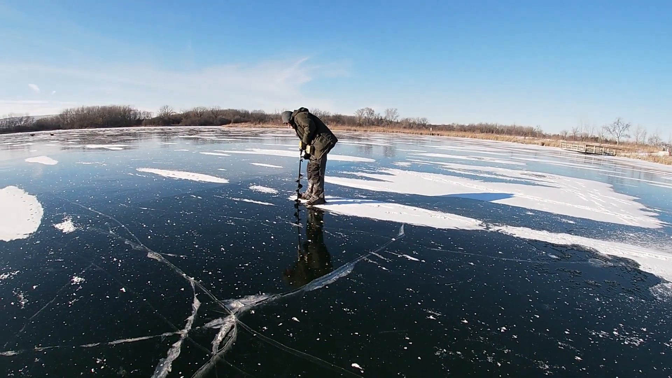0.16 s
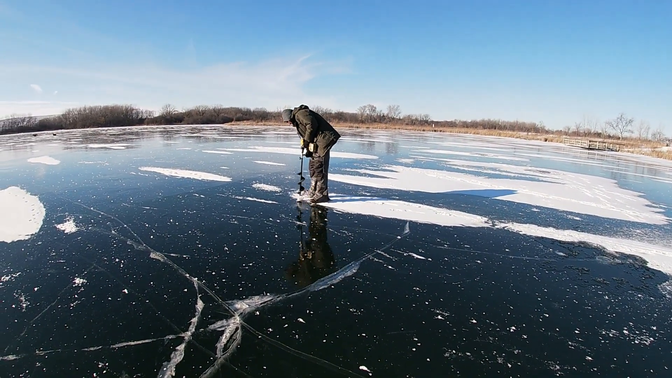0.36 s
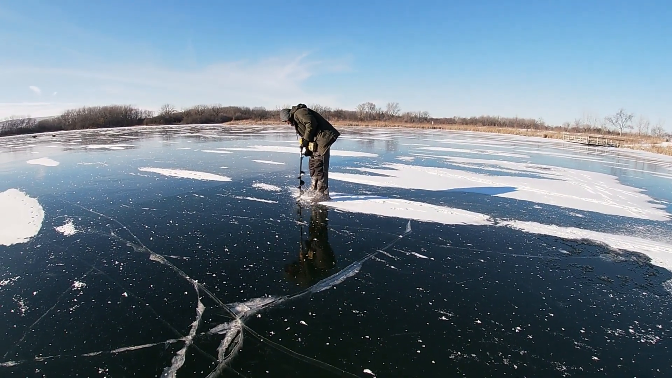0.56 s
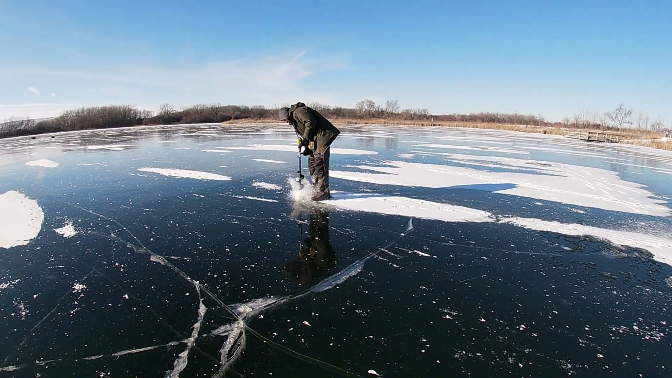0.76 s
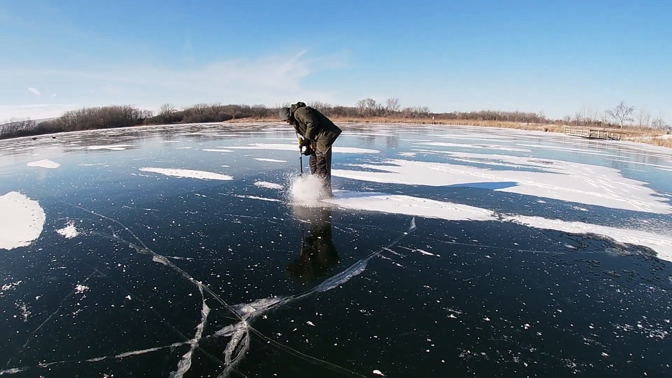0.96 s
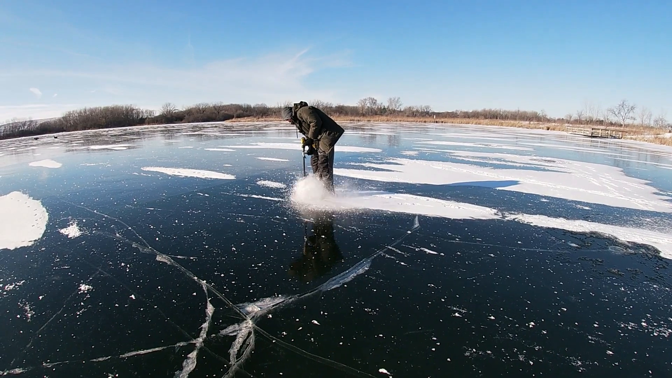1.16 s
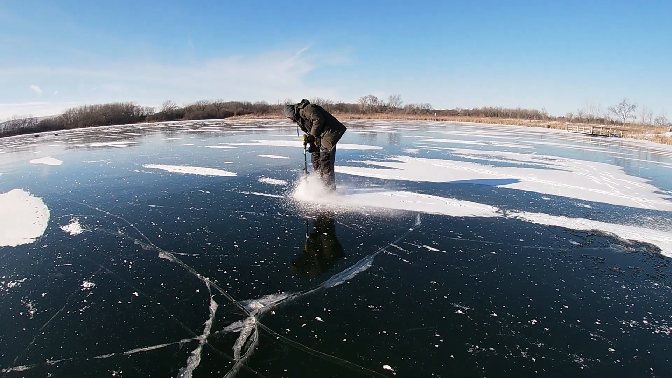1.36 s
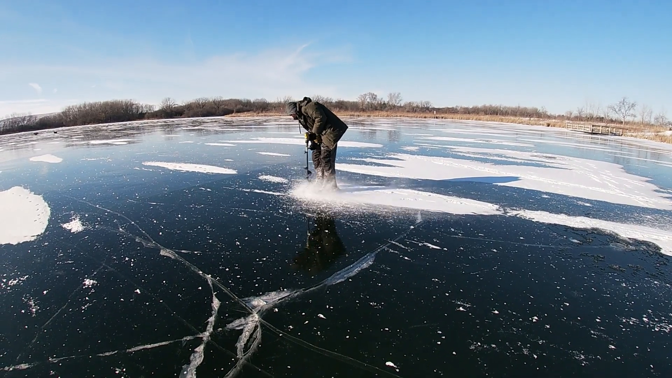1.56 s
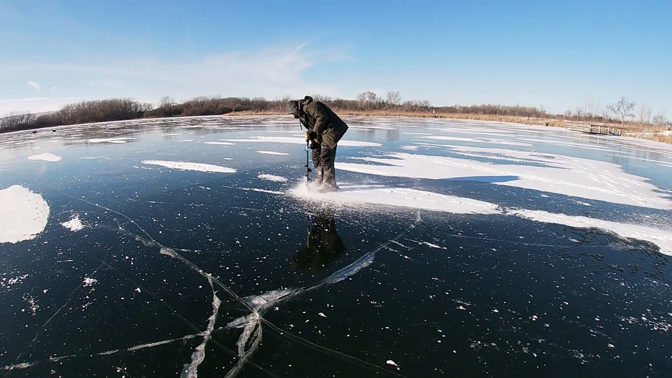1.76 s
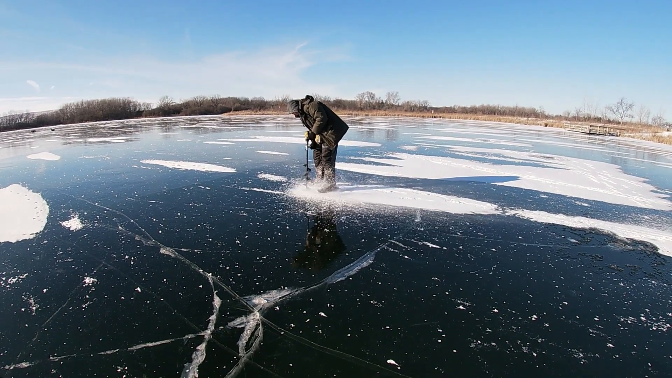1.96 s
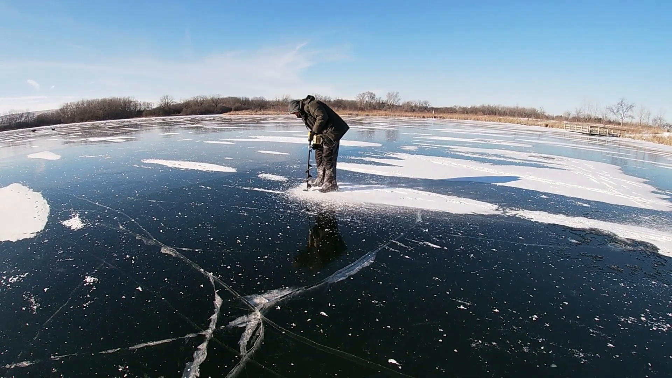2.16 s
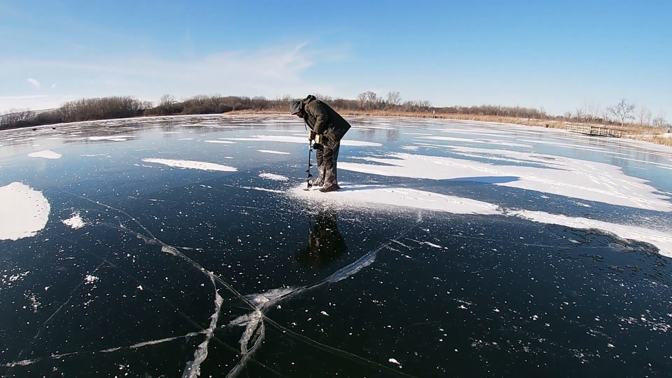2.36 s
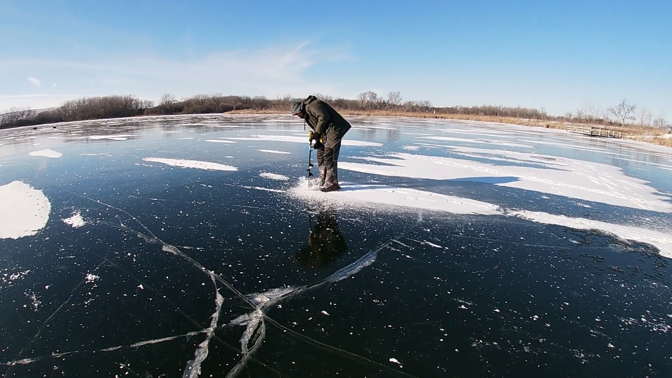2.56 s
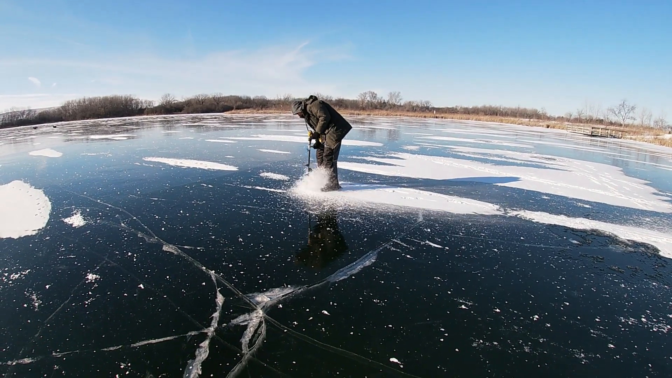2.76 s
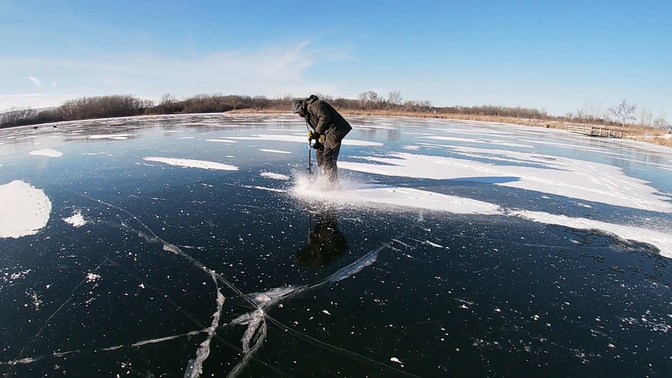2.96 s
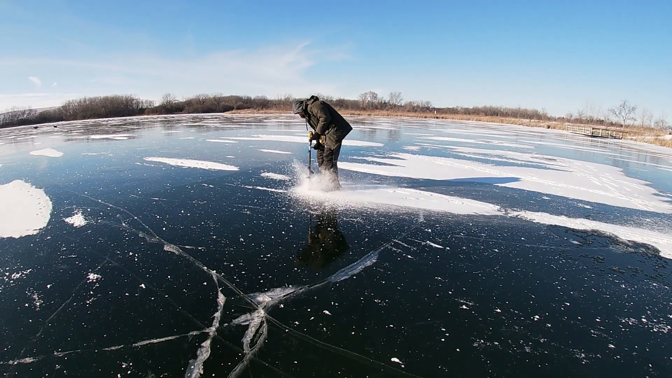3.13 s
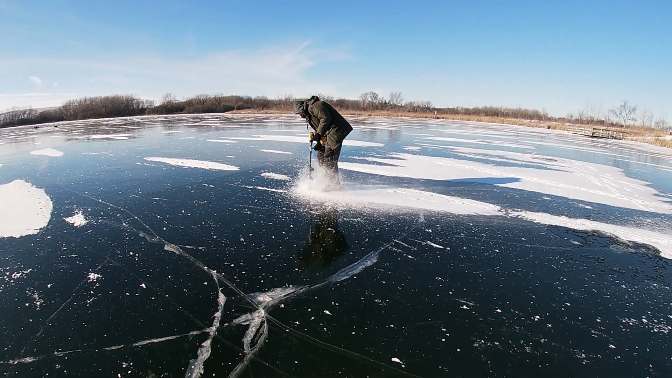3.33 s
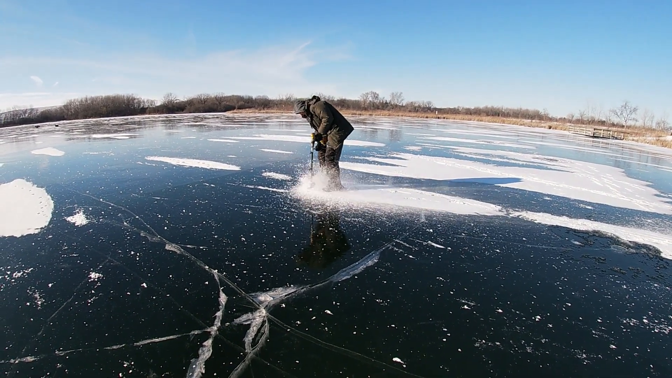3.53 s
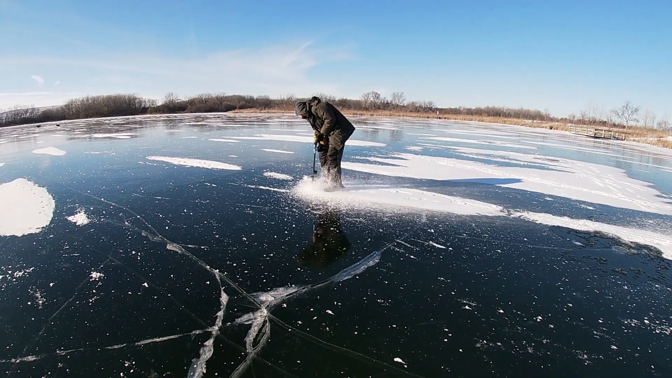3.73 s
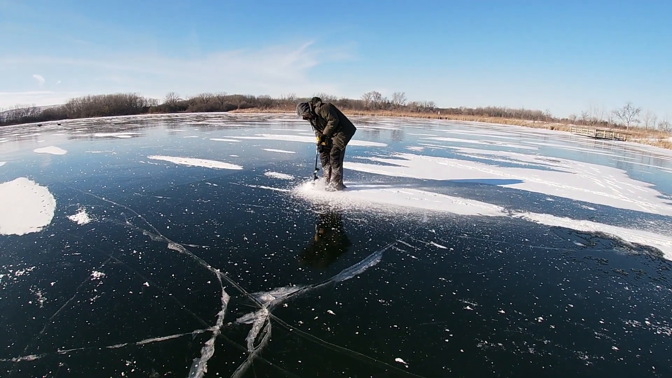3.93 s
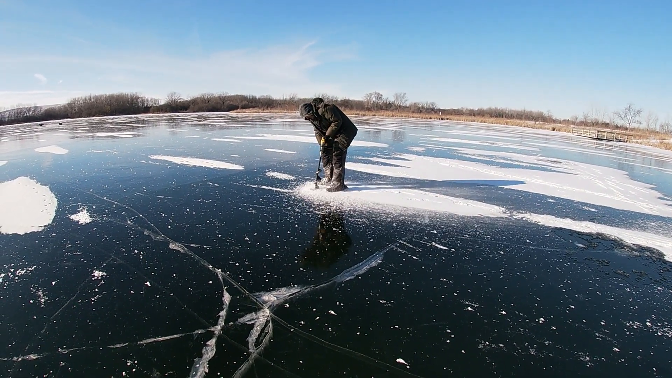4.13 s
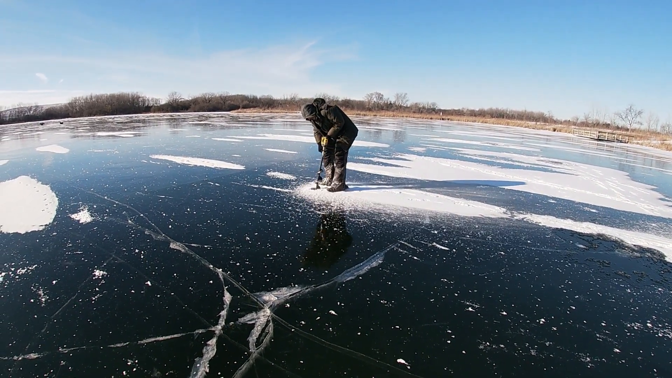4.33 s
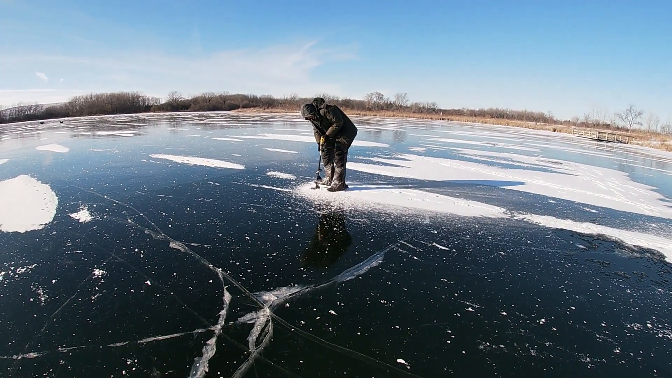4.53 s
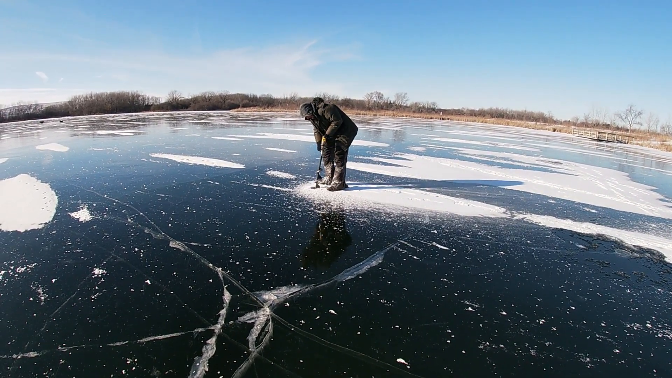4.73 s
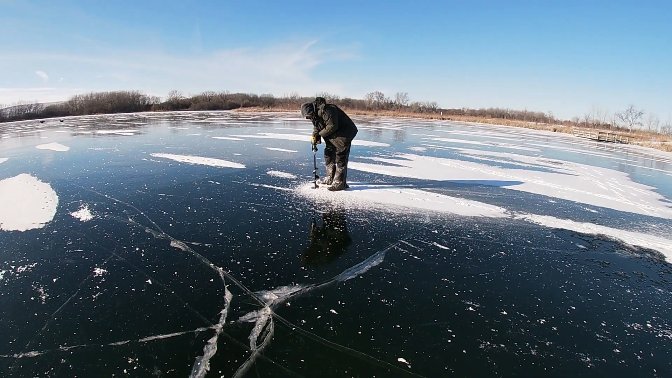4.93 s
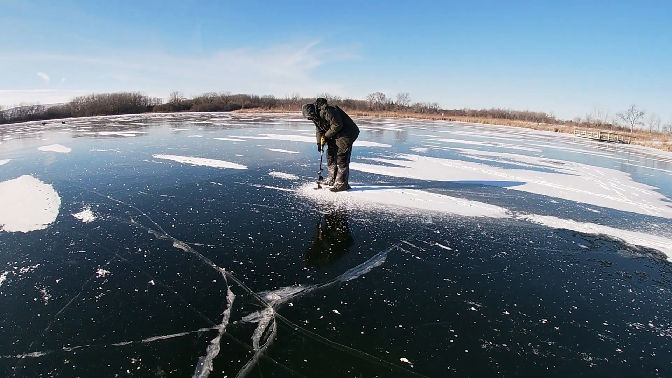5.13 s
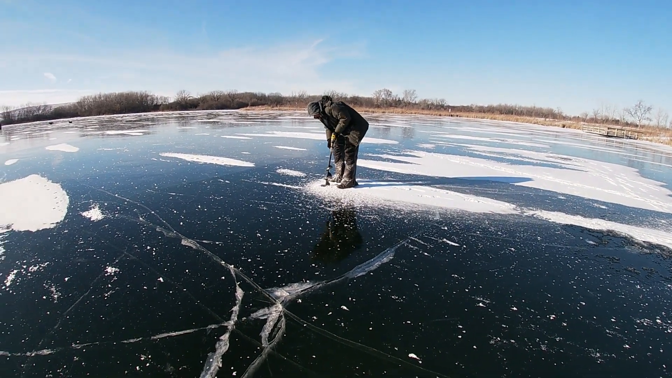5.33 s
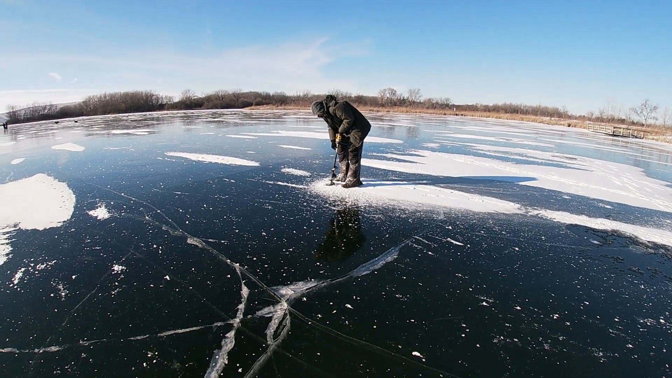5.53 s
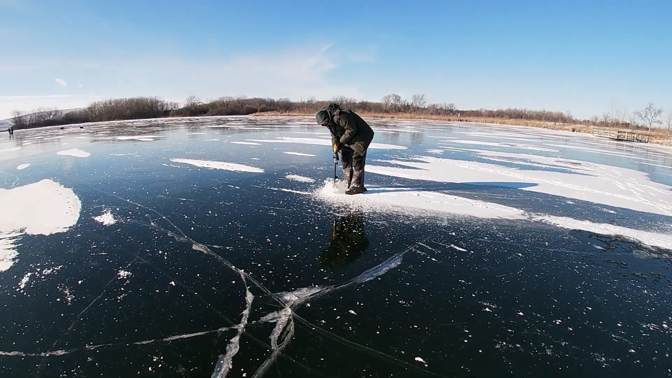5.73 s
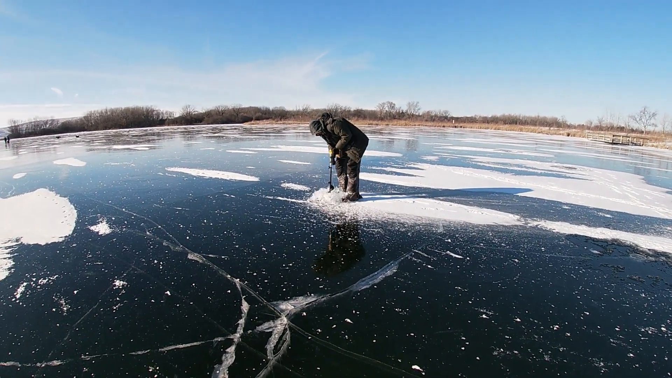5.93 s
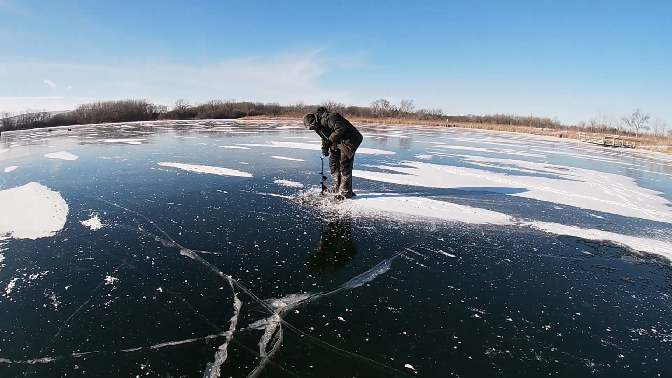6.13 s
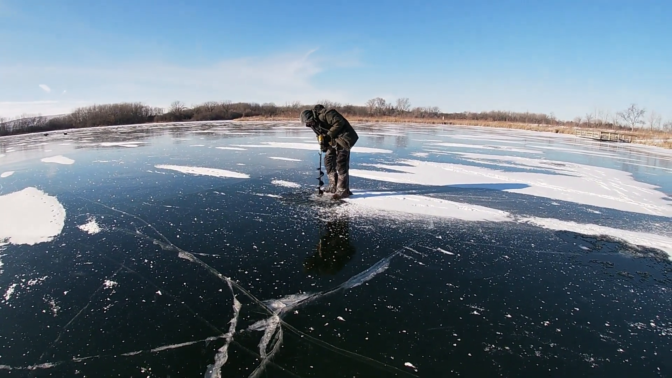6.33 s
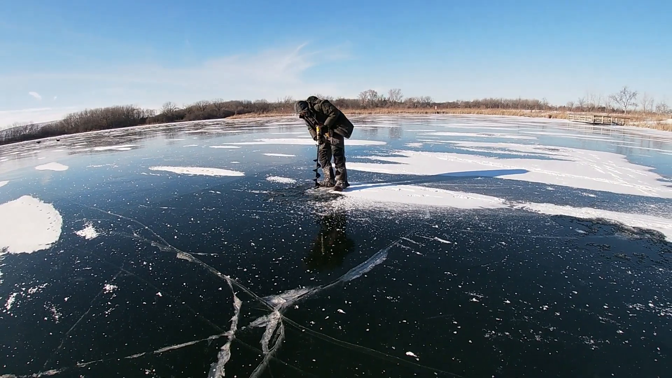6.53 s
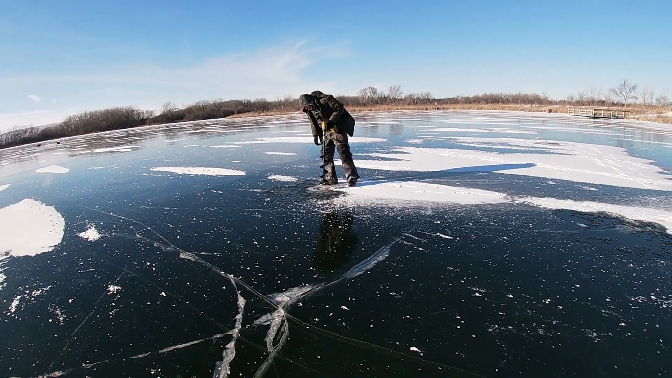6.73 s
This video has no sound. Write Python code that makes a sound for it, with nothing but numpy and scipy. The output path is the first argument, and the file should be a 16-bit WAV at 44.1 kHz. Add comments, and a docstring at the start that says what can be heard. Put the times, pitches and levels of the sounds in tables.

```python
"""Wind buffets the microphone throughout; within half a second an ice auger bites into a frozen lake.
Its blades scrape and chatter in quick bites, in three spells with two stops; slush churns in the last one.
Flickering noise through steel and ice resonances makes the scrape, decaying sines the chips, noise bursts
the knocks, resonant noise and gliding sines the hole, narrow noise the squeaks, shaped noise the wind."""
import sys
import numpy as np
from scipy import signal
from scipy.fft import rfft, irfft, next_fast_len
from scipy.io import wavfile
from scipy.ndimage import uniform_filter1d, map_coordinates

SR = 44100
rng = np.random.default_rng(int(sys.argv[2]) if len(sys.argv) > 2 else 0)


def persist_wave(psi):
    """Save psi, clipped to +-1, as 16-bit WAV."""
    counts = np.round(np.clip(psi, -1, 1) * 32767).astype(np.int16)
    wavfile.write(sys.argv[1], SR, np.atleast_2d(counts).T)


N = 303701
T = np.arange(N) / SR


def amp(db):
    """dB to gain."""
    return 10 ** (np.asarray(db) / 20)


def unit(x):
    """Scaled to rms 1."""
    return x / np.sqrt(np.mean(x ** 2) + 1e-20)


def curves(rows):
    """One value per sample for each column after the time."""
    time_s, *columns = np.transpose(rows)
    return [np.interp(T, time_s, column) for column in columns]


def wobble(knots_per_s):
    """Smooth random curve through normal random knots."""
    knots = rng.standard_normal(int(N * knots_per_s / SR) + 4)
    return map_coordinates(knots, [T * knots_per_s])


def filtered(x, response):
    """x times a complex response of frequency."""
    n = x.shape[-1]
    m = next_fast_len(n + 8192)  # zero padding for the ring-out
    spectrum = rfft(x, m) * response(np.fft.rfftfreq(m, 1 / SR))
    return irfft(spectrum, m)[..., :n]


def colour(points):
    """Gain through (freq_hz, level_db) points on a log frequency axis."""
    freq_hz, level_db = np.transpose(points)
    return lambda f: amp(np.interp(np.log(f + 1), np.log(freq_hz + 1), level_db))


def modes(table):
    """Sum of (centre_hz, width_hz, level_db) resonances, alternating in sign."""
    def response(f):
        total = 0
        for k, (centre_hz, width_hz, level_db) in enumerate(table):
            damping = 1j * f * width_hz
            total = total + (-1) ** k * amp(level_db) * damping / (centre_hz ** 2 - f * f + damping)
        return total
    return response


def unit_gain(response):
    """Gain that gives a response an rms of 1 over the band."""
    return 1 / np.sqrt(np.mean(np.abs(response(np.linspace(0, SR / 2, num=4096))) ** 2))


def noise(patchy_db):
    """Noise of rms 1; random time-frequency patches vary its level by patchy_db rms."""
    z = signal.stft(rng.standard_normal(N), nperseg=256)[2]
    field = uniform_filter1d(rng.standard_normal(z.shape), 3, axis=0)
    field = uniform_filter1d(field, 5, axis=1)
    patched = z * amp(patchy_db * unit(field))
    return unit(signal.istft(patched, nperseg=256)[1][:N])


# blade catches tearing ice: start_s, level_db, skip_depth_db (no skip if <= 0)
BITES = [(.444, -32, 0), (0.5044, -29.5, 3.5), (0.7995, -31, -20.5), (.9984, -24, 1), (1.167, -22, 0.5),
         (1.206, -24.5, 4.5), (1.2486, -22, 3), (1.3394, -28, 4.5), (1.389, -30.5, 11), (1.417, -42, 9),
         (1.51, -15.5, 4), (1.532, -24, 0.5), (1.585, -25.5, -4.5), (1.6093, -17, 5), (1.667, -18.5, 3),
         (1.689, -20.5, 9.5), (1.7085, -19, 3), (1.725, -29, 6.5), (1.7885, -28, 5), (1.824, -19.5, 4),
         (1.843, -29.5, 8.5), (1.8768, -16.5, 4), (1.8967, -21, 13), (1.956, -17, 2.5), (1.974, -18, 8),
         (2.019, -21, -9), (2.0347, -23, 5), (2.0892, -36, 8), (2.1245, -28, 4), (2.1835, -37, -5),
         (2.225, -36.5, 9), (2.671, -27.5, 2), (2.6879, -19, 2), (2.743, -32.5, 0.5), (2.791, -24.5, 6.5),
         (2.8294, -26, 8.5), (2.874, -21.5, 7.5), (2.9194, -14, 6), (2.9375, -16.5, 11),
         (2.958, -17.5, 9.5), (3.004, -18, 9), (3.046, -16, 2), (3.078, -22, 6), (3.125, -17, 1),
         (3.1613, -20, 3.5), (3.2056, -20, 3.5), (3.248, -17.5, 8.5), (3.296, -19.5, 9),
         (3.3366, -19.5, 9.5), (3.383, -21.5, 2.5), (3.419, -19, 2), (3.475, -24.5, 3.5), (3.512, -18, 1),
         (3.572, -23, 1), (3.622, -20, 3.5), (3.684, -21, -3), (3.7185, -24, -5), (3.973, -21.5, 3),
         (4.028, -22.5, -1), (5.5634, -31.5, -4), (5.586, -45, -1), (5.6615, -26, -18), (5.7159, -37.5, 7),
         (5.7334, -26.5, 2), (5.794, -33, -1), (5.8185, -21, 4), (5.892, -23, 4), (5.918, -22, -3),
         (5.963, -21.5, 5), (5.9883, -21, -7), (6.025, -18.5, 4), (6.078, -29, -3), (6.128, -33, 6),
         (6.152, -31.5, 3), (6.31, -35, 4)]
# blade and ice sheet resonances: centre_hz, width_hz, level_db
BLADE_MODES = [(2008, 207, 12), (2866, 430, 4.5), (3404, 82, 1.5), (4016, 48, 5), (4640, 100, -4)]
# low grind resonances: centre_hz, width_hz, level_db
GRIND_MODES = [(735, 246, -3.5), (1340, 189, 1), (1568, 210, -1)]
# scrape spectrum: freq_hz, level_db
SCRAPE_COLOUR = [(900, -39.5), (1500, -10), (1900, -8.5), (3500, 4.5), (4800, 1.5), (5300, -1),
                 (5800, -7.5), (6150, -25), (7500, -56), (16000, -100)]
# fine shavings spectrum: freq_hz, level_db
SHAVINGS_COLOUR = [(4500, -6), (6000, 1.5), (6600, -2), (7200, -2), (7800, -6), (8400, -2), (9500, -8.5),
                   (10300, -13), (11800, -18.5), (13000, -24), (14000, -35.5), (15500, -47)]
SKIP_S, CATCH_S, TEAR_S = .012, 0.002, 0.017  # time constants: lift before, onset, decay after
SNAP_S, SNAP_DB = 0.0017, -5  # chip breaking off: decay constant, level over the tear


def auger():
    """Crumbling ice drives the blades; bites start fast and die, most after a short skip."""
    scrape_db, fine_db, low_db, upper_db = contact()
    power = amp(scrape_db) ** 2
    t = T[:SR // 10]
    for start_s, level_db, skip_db in BITES:
        i = round(start_s * SR)
        skip_shape = np.exp(-(t[::-1] / SKIP_S) ** 2)
        power[i - len(t):i] *= amp(-max(skip_db, 0) * skip_shape) ** 2
        tear = np.exp(-(t / TEAR_S) ** 2)
        snap = amp(SNAP_DB) * np.exp(-t / SNAP_S)
        catch = 1 - np.exp(-t / CATCH_S)
        power[i:i + len(t)] += (amp(level_db) * (tear + snap) * catch) ** 2

    # ice breaks unevenly, so the force flickers
    flicker = unit(amp(0.52 * wobble(50) + 0.2 * wobble(300)))
    force = np.sqrt(power) * flicker
    crumbs = force * (noise(1.5) + 0.45 * chips(count=7000))

    def body(f):
        return colour(SCRAPE_COLOUR)(f) * (1 + 0.87 * np.abs(modes(BLADE_MODES)(f)))

    def grind(f):
        return modes(GRIND_MODES)(f) / (1 + (f / 2000) ** 4) / (1 + (550 / (f + 1)) ** 4)

    shavings = colour(SHAVINGS_COLOUR)
    spray = uniform_filter1d(force, size=SR // 120) * amp(fine_db) * noise(3.1)
    # sharper contact drives the modes above 2.8 kHz harder
    upper = filtered(crumbs, lambda f: 1 / (1 + (2800 / (f + 1)) ** 4))
    tilted = crumbs + (amp(upper_db) - 1) * upper
    out = amp(-3.5) * unit_gain(body) * filtered(tilted, body)
    out += unit_gain(grind) * filtered(amp(low_db) * crumbs, grind)
    return out + unit_gain(shavings) * filtered(spray, shavings)


# cutting spells, one table each: time_s, scrape_db, then re scrape: shavings_db, grind_db, upper_modes_db
CUTS = [
    [(.32, -59, -40, -7, 0), (.372, -36, -32, -8, -12), (.395, -28, -34, -11, -3), (.42, -37, -18, -13, -4),
     (.46, -30.5, -16, -9, 4.5), (.58, -32.5, -9.5, -15, 8.5), (.61, -29, -22, -11, -4.5),
     (.68, -40.5, -14, -9.5, 3.5), (.77, -44.5, -11, -6, 9.5), (.83, -25.5, -11.5, -10, 8.5),
     (1.1, -19.5, -28.5, -18.5, -3.5), (1.5, -18, -28.5, -16, -5.5), (1.84, -21, -22, -7, -1),
     (1.93, -32.5, -19, -10, 3), (2.13, -29, -25.5, -10.5, -9.5), (2.17, -47, -16, -14, 3),
     (2.26, -39, -21, -8, -3)],
    [(2.61, -41, -27, 3, 5), (2.64, -31, -16.5, -8, 2), (2.77, -21.5, -15, -11.5, 4.5),
     (3.05, -24, -18, -13, 0), (3.45, -24, -18.5, -11, 0.5), (3.9, -19.5, -27, -16, -4),
     (4.135, -21, -28.5, -13, -7), (4.165, -40, -37, -13, -21), (4.38, -59, -41, -26, -13)],
    [(4.97, -44.5, -28, -4, -11), (5.05, -39, -21, -2, -5), (5.1, -42.5, -24, 0, -2),
     (5.15, -49.5, -28, -2, -12), (5.37, -47, -26, 1, -3), (5.41, -40, -28, -5, -4),
     (5.45, -50, -31, 2, -10), (5.53, -46.5, -26, 7, -2), (5.555, -31.5, -26, -7, -3),
     (5.62, -31, -25.5, -5.5, -6), (5.68, -30, -21.5, -0.5, 2.5), (5.98, -28, -19.5, -17.5, -2),
     (6.09, -36.5, -20.5, -20, -3), (6.33, -37.5, -21.5, -16, -2), (6.5, -59, -14, -1, 6)],
]
# blades resting on the ice: scrape_db, shavings_db, grind_db, upper_modes_db
RESTING = (-56, -25.5, -0.5, -6.5)


def contact():
    """Blade controls: those of a spell while it lasts, else those of rest, smoothed over 10 ms."""
    out = np.outer(RESTING, np.ones(N))
    for rows in CUTS:
        cutting = (T >= rows[0][0]) & (T <= rows[-1][0])
        out = np.where(cutting, curves(rows), out)
    return uniform_filter1d(out, size=SR // 100, axis=1)


def chips(count):
    """Ice splinters ping at pitches of their own, falling 60 dB in 60 cycles, cut at 9 ms."""
    u, z = rng.random((count, 2)), rng.standard_normal((count, 2))
    t = T[:400]
    pitch_hz = 2700 * np.exp(0.3817 * z[:, :1])
    envelope = amp(1.95 * z[:, 1:] - 60 * t * pitch_hz / 60) * (1 - np.exp(-t / 0.00013))
    splinters = envelope * np.sin(2 * np.pi * pitch_hz * t)
    at = (u[:, :1] * N).astype(int) + np.arange(len(t))
    return unit(np.bincount(at.ravel(), splinters.ravel())[:N])


PING_HZ, PING_LOG_SPREAD = 2500, .2  # median pitch, spread of its natural log
PING_T60_S, PING_DB = 0.071, 0  # decay, mean level over the bite


def pings():
    """Each bite frees a chip that rings briefly at a pitch of its own."""
    out, t = np.zeros(N), T[:SR // 20]
    draws = rng.standard_normal((len(BITES), 2))
    for (start_s, bite_db, _), (pitch_draw, level_draw) in zip(BITES, draws):
        pitch_hz = PING_HZ * np.exp(PING_LOG_SPREAD * pitch_draw)
        decay = amp(bite_db + PING_DB + 2.3 * level_draw - 60 * t / PING_T60_S)
        ring = decay * np.sin(2 * np.pi * pitch_hz * t) * (1 - np.exp(-t / CATCH_S))
        out[round(start_s * SR):][:len(t)] += ring
    return out


# steel on ice: start_s, level_db (before the resonances), centre_hz, crack_t60_s
KNOCKS = [(.0603, -39, 1900, .02), (.2843, -36, 2000, .015), (.3705, -9, 3600, .025),
          (.387, -13.5, 2200, .03), (2.626, -21.5, 2200, .02), (5.070, -6.5, 3300, .02),
          (5.5465, -1.5, 3300, .02), (6.619, -10.5, 4600, .025)]


def knocks():
    """A sharp blow and a short crack excite a broad snap and a resonance at the knock's centre."""
    out, t = np.zeros(N), T[:SR // 10]
    for start_s, level_db, centre_hz, t60_s in KNOCKS:
        blow = 0.94 * amp(-60 * t / 0.009) * np.sign(rng.standard_normal(len(t)))
        crack = amp(-60 * t / abs(t60_s)) * rng.standard_normal(len(t))

        def snap(f):
            ring = modes([(centre_hz, 500, 0)])(f)
            broad = modes([(3000, 3500, -3)])(f)
            return (ring + broad) / (1 + 1j * f / 6000) ** 4

        out[round(start_s * SR):][:len(t)] += filtered(amp(level_db) * (blow + crack), snap)
    return out


# slush in the hole: time_s, level_db
SLUSH = [(4.95, -54), (5.03, -32), (5.15, -36), (5.53, -42), (5.68, -32), (5.78, -33), (5.83, -27),
         (5.88, -31), (5.99, -28), (6.09, -33.5), (6.22, -31.5), (6.27, -28), (6.31, -29.5), (6.42, -33.5),
         (6.55, -56), (6.62, -55)]
# glugs and groans of air in the hole: start_s, end_s, start_hz, end_hz, level_db (before waver and flutter)
GLUGS = [(1.425, 1.602, 736, 780, -52), (1.593, 1.837, 750, 760, -38), (2.528, 2.6, 438, 410, -37),
         (2.6, 2.664, 475, 395, -37), (5.009, 5.046, 598, 720, -32), (5.034, 5.087, 570, 583, -34.5),
         (5.227, 5.48, 570, 555, -37.5), (5.466, 5.562, 555, 694, -34), (5.598, 5.651, 560, 543, -27),
         (5.653, 5.687, 638, 720, -25), (5.691, 5.765, 532, 403, -29.5), (5.72, 5.759, 906, 857, -25),
         (5.908, 6, 620, 571, -29), (5.916, 5.981, 873, 890, -27), (5.993, 6.009, 680, 750, -15),
         (6.01, 6.084, 680, 653, -32.5), (6.252, 6.29, 562, 634, -29)]


def hole():
    """Slush sloshes in broad resonances; trapped air sings short unsteady glides."""
    def cavity(f):
        return modes([(400, 400, -2), (750, 500, 0), (1200, 900, -5)])(f) / (1 + (f / 2500) ** 4)

    slosh = unit(filtered(noise(4.5), cavity))
    wet = (T > SLUSH[0][0]) & (T < SLUSH[-1][0])
    out = wet * amp(curves(SLUSH)[0] + 0.93 * wobble(30)) * slosh
    waver, flutter, rasp = wobble(60), wobble(45), wobble(180)
    for start_s, end_s, start_hz, end_hz, level_db in GLUGS:
        pitch_hz = np.interp(T, [start_s, end_s], [start_hz, end_hz]) * (1 + 0.048 * waver)
        gate = np.clip(np.minimum(T - start_s, end_s - T) / 0.014, 0, 1)
        gate *= amp(2.6 * flutter + 3.6 * rasp)
        out += gate * amp(level_db) * np.sin(2 * np.pi * np.cumsum(pitch_hz) / SR)
    return out


# fuzzy squeaks and scuffs: start_s, end_s, centre_hz, width_hz (of a resonance applied twice), level_db
SQUEAKS = [(0, .035, 3300, 1400, -50), (.125, .185, 3030, 110, -57), (.125, .2, 3700, 1200, -55),
           (4.17, 4.273, 1630, 130, -44), (4.18, 4.27, 2000, 450, -43), (4.25, 4.388, 1930, 200, -44),
           (4.2, 4.385, 2550, 700, -52), (4.52, 4.556, 3950, 60, -53), (6.595, 6.617, 3400, 900, -41),
           (6.594, 6.616, 6000, 200, -55), (6.622, 6.655, 5000, 2500, -54), (6.682, 6.775, 4300, 700, -53),
           (6.682, 6.775, 5800, 1100, -59)]


def squeaks():
    """Noise through a squared resonance, with 7.6 ms ramps at both ends."""
    out = np.zeros(N)
    for start_s, end_s, centre_hz, width_hz, level_db in SQUEAKS:
        t = T[round(start_s * SR):round(end_s * SR)]
        resonance = modes([(centre_hz, width_hz, 0)])
        band = unit(filtered(rng.standard_normal(SR // 3), lambda f: resonance(f) ** 2))
        gate = np.clip(np.minimum(t - start_s, end_s - t) / 0.0076, 0, 1)
        out[round(start_s * SR):][:len(t)] += amp(level_db) * band[-len(t):] * gate
    return out


# wind strength: time_s, buffet_db, upper_lift_db, far_hiss_db
WIND = [(0.0, -36, 4, -39), (0.09, -21, -5.5, -36.5), (0.31, -30, -2, -34.5), (1.0, -18.5, -0.5, -35),
        (1.36, -28, 1, -39), (1.84, -22.5, 0.5, -39), (1.92, -34, -2, -35.5), (2.32, -24, -5, -35.5),
        (2.59, -32.5, -8.5, -37), (2.95, -24, 1.5, -37.5), (3.83, -23, 0, -37), (4.01, -19.5, 1, -40),
        (4.76, -28.5, -4, -36.5), (5.08, -22.5, 2.5, -35.5), (5.12, -37.5, 9, -36), (5.22, -21, -1, -36.5),
        (5.37, -29.5, -2.5, -34.5), (5.81, -20, -1.5, -40), (5.85, -24.5, 8.5, -38),
        (6.14, -30, 1.5, -32.5), (6.35, -18, 3, -34), (6.67, -30.5, -8.5, -30.5), (6.83, -19.5, -6, -36.5),
        (6.89, -15.5, -5, -35)]
# buffet spectrum: freq_hz, level_db
BUFFET_COLOUR = [(12, -39), (20, -8), (54, 1), (81, 2), (120, -2), (242, -19), (400, -40.5), (520, -38.5),
                 (880, -120)]
# far hiss spectrum: freq_hz, level_db
FAR_COLOUR = [(150, -1), (250, -2), (358, -6), (518, -9), (741, -13), (2000, -21), (5940, -64), (7720, -79),
              (13100, -120)]


def wind():
    """Eddies thump the microphone in lumps, small fast ones above 110 Hz; far air hisses smoothly."""
    buffet_db, lift_db, far_db = curves(WIND)
    rumble = filtered(rng.standard_normal(N), colour(BUFFET_COLOUR))
    buffet = unit(amp(1.7 * wobble(13)) * rumble)
    upper = filtered(buffet, lambda f: 1 / (1 + (110 / (f + 1)) ** 6))
    buffet += (amp(lift_db) - 1) * upper
    hiss_gain = amp(far_db + 1.1 * wobble(9))
    hiss = unit(filtered(noise(2.04), colour(FAR_COLOUR)))
    return amp(buffet_db) * buffet + hiss_gain * hiss


def scene():
    """Open lake: all sources add, no walls answer."""
    return (auger() + pings() + knocks() + hole() + squeaks() + wind())[None]


CEILING, TOP_HZ = .52, 15500  # full scale = 1


def record(dry):
    """A small camera's microphone rounds off peaks towards the ceiling and passes nothing above TOP_HZ."""
    soft = dry / (1 + np.abs(dry / CEILING) ** 3) ** (1 / 3)
    return filtered(soft, lambda f: f < TOP_HZ)


dry = scene()
out = record(dry)
persist_wave(out)
```